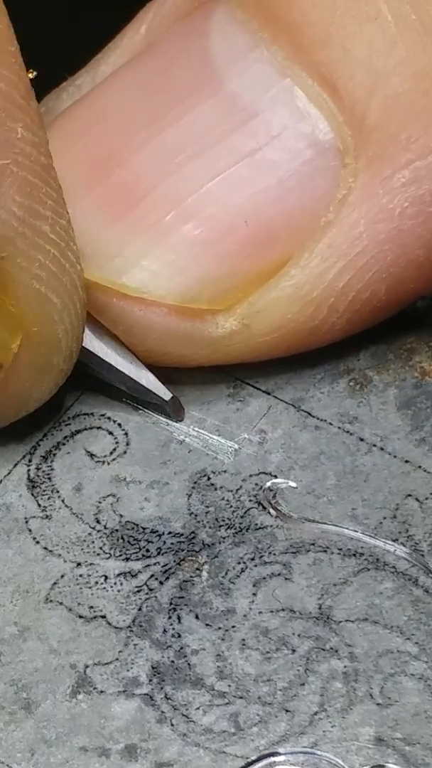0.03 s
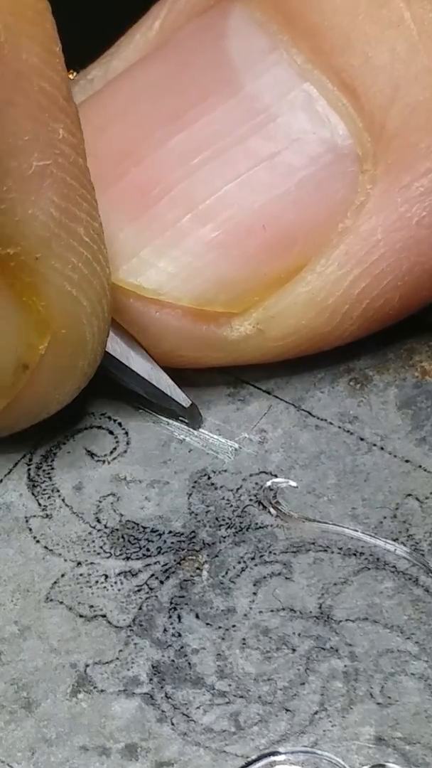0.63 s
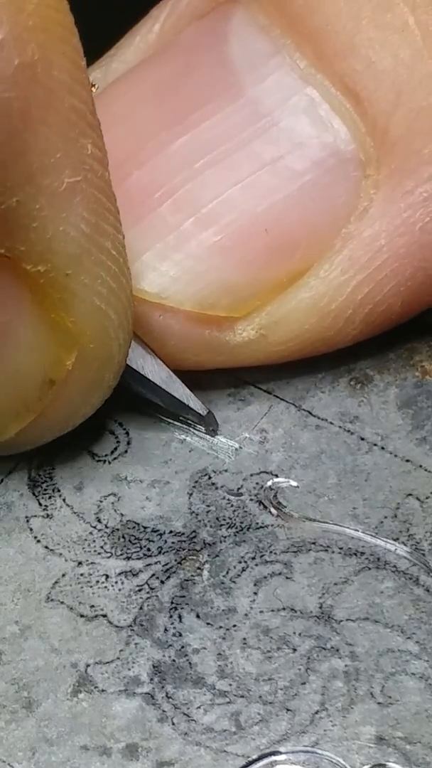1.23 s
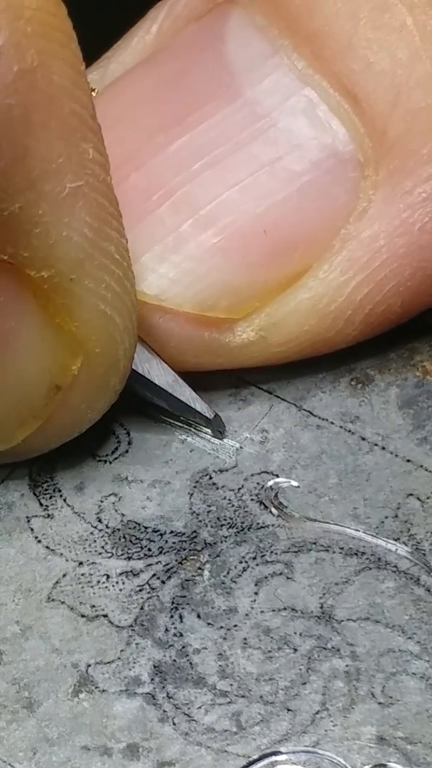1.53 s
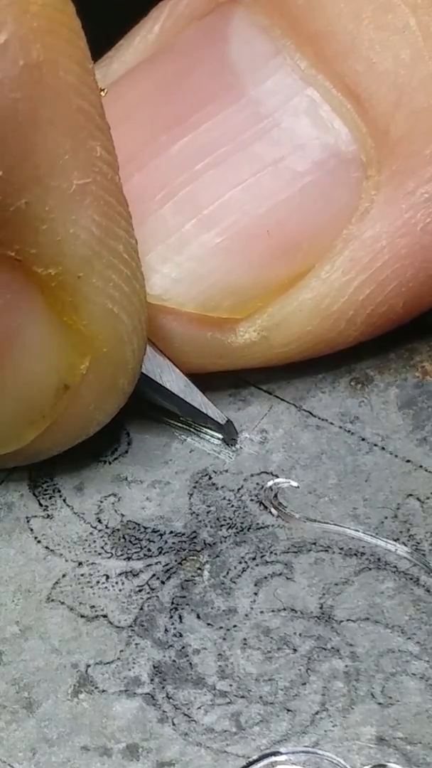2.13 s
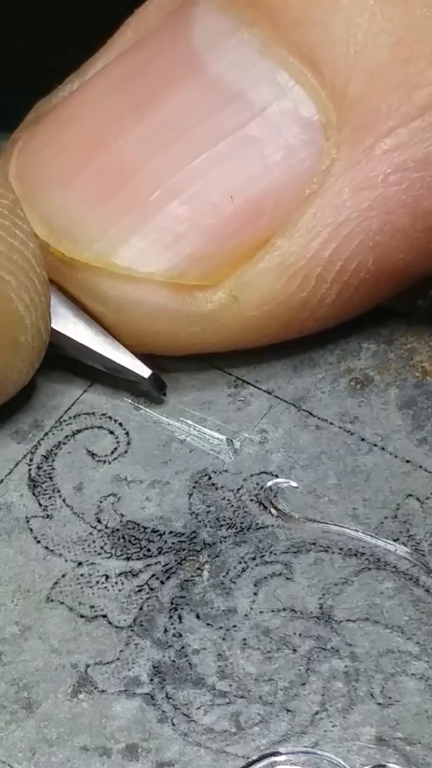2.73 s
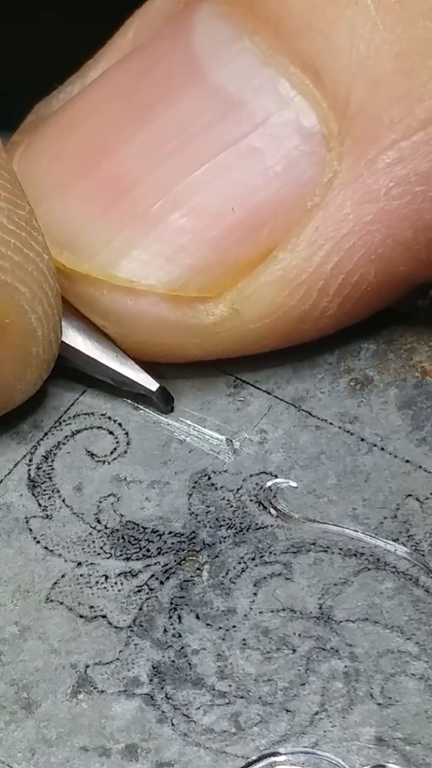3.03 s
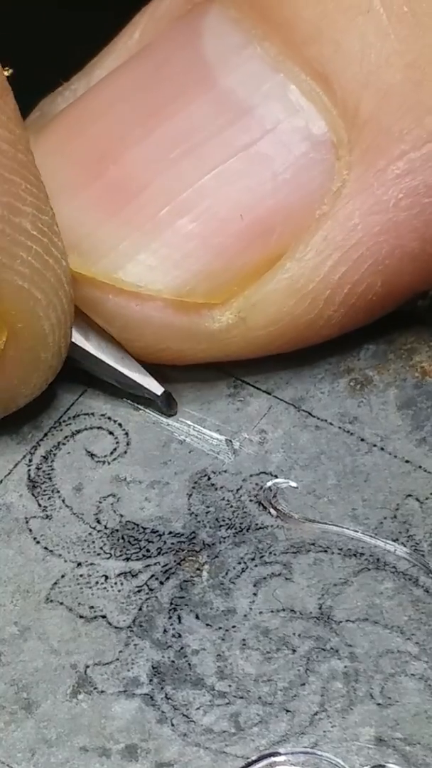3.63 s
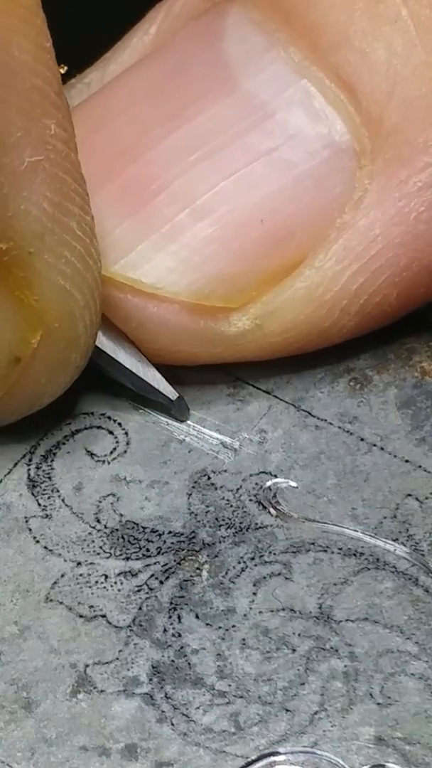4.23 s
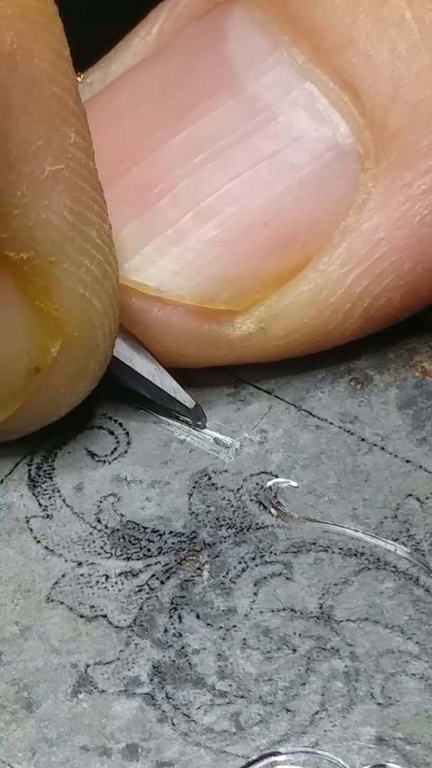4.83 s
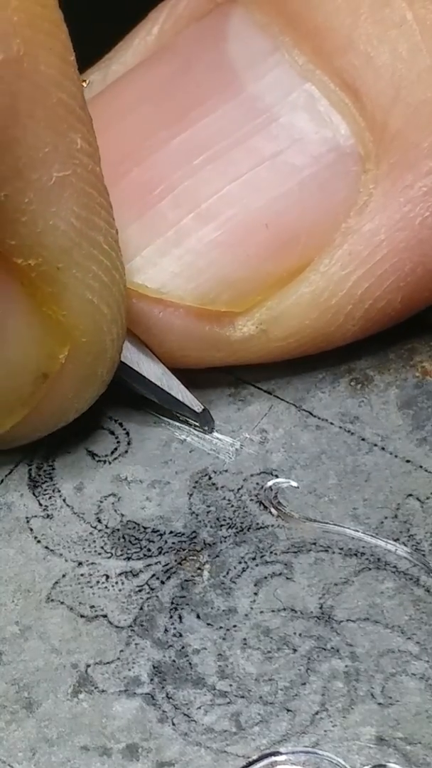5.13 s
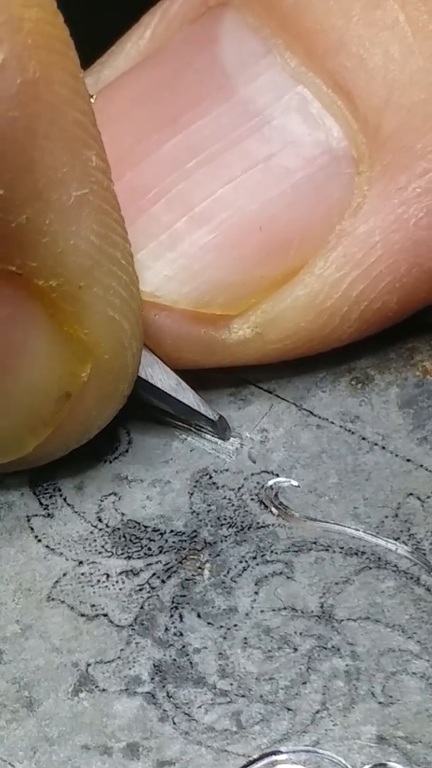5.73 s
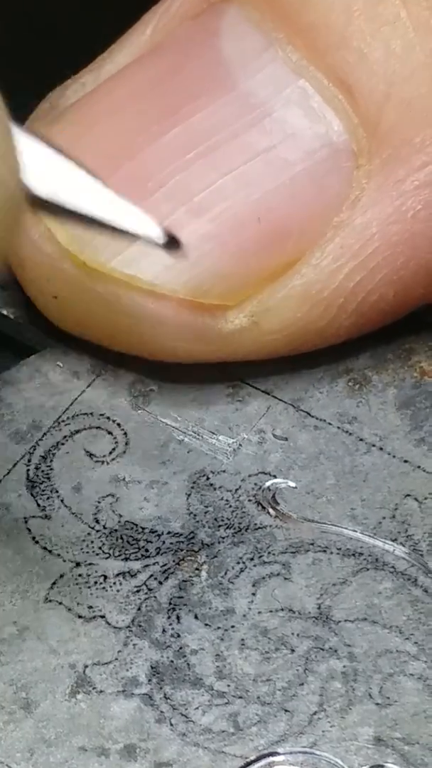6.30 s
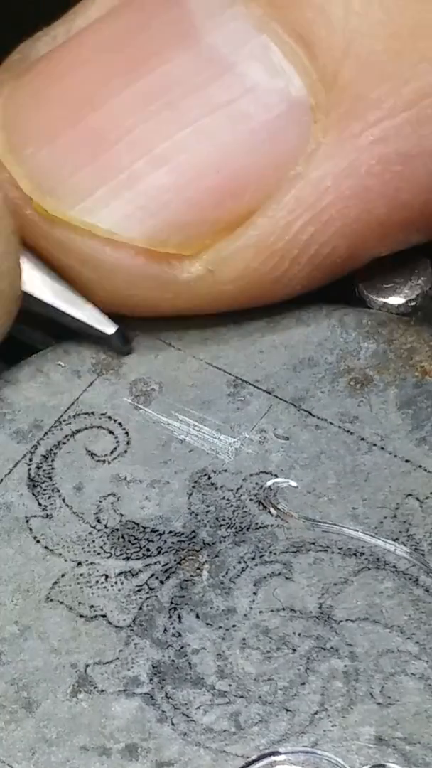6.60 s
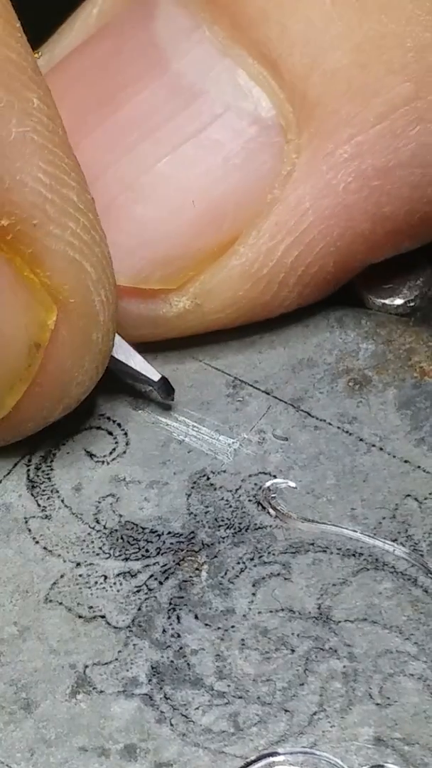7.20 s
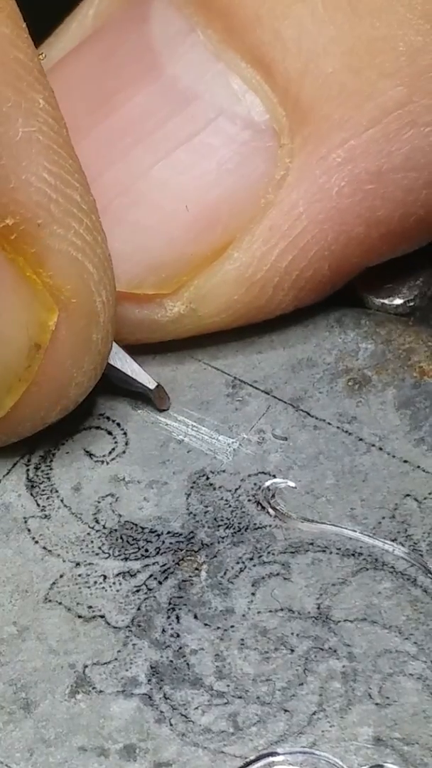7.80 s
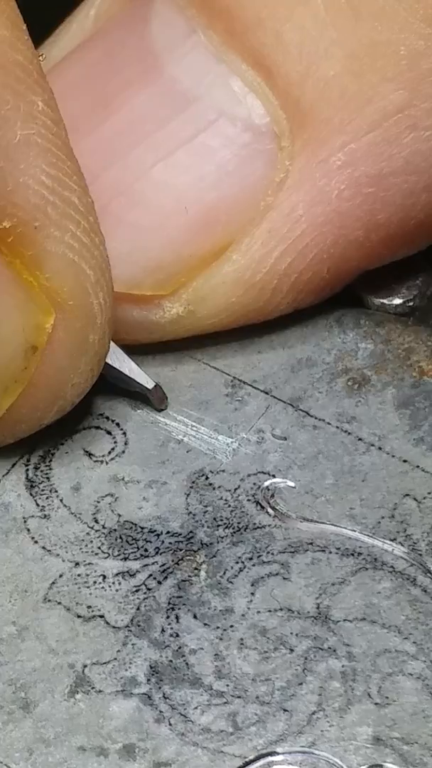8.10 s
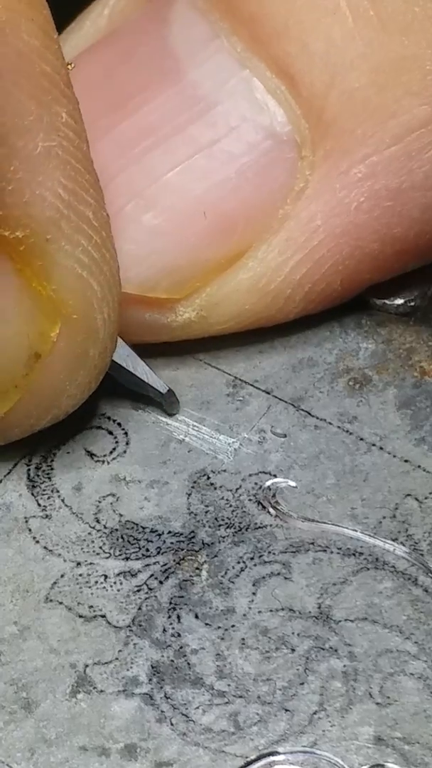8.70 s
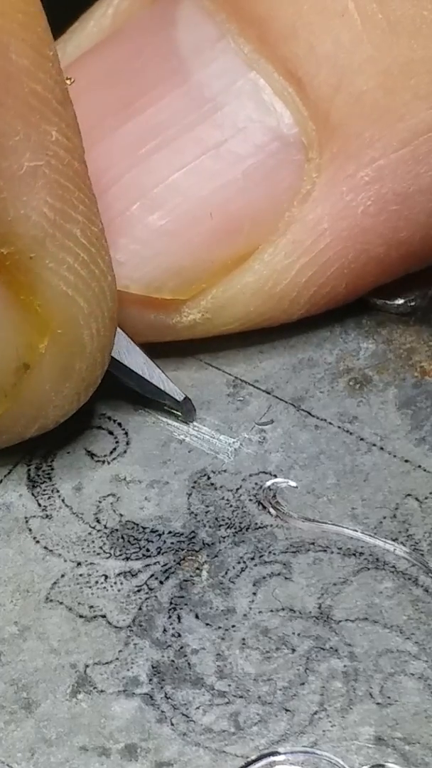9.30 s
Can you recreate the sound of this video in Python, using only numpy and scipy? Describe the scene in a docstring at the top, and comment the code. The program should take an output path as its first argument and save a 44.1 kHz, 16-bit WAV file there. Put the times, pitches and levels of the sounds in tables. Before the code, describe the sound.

An air-driven hammer engraver is heard close up in a small workshop with little echo. Almost at once it spins up into a loud, bright, rattling buzz against a steel plate, with a few dull hand bumps on the bench. The tip skids, then bites at about 0.9 seconds, and the tone turns harder. At about 2.3 seconds the buzz slows and fades to a quiet fluttering idle over a low hum and faint air hiss. Short runs of light metallic knocks come between 3 and 3.7 seconds. A second loud cut starts at 3.8 seconds, bites at about 4.5 and winds down from 6.3, followed by a brief knock and a soft bump. The tool idles quietly, with a thin, high air whistle growing slightly from 7 seconds. A third cut starts at 8.3 seconds and buzzes on to the end, at about 9.5 seconds.

```python
"""An air-driven hammer graver, a hand tool for engraving, cuts a steel plate in a small workshop.
The air supply hums and hands bump the bench as the piston speeds up from 48 to 80 strokes a second.
Each stroke puffs, rattles and strikes, ringing tool and plate; the tip skids, then bites into the steel.
Just after 2 s the tip lifts and the piston slows to a quiet idle with a few light knocks. A second cut
runs from about 3.8 to 6.3 s, the tool idles again, and a third cut runs from 8.3 s to the end."""
import sys
import numpy as np
from scipy import signal
from scipy.fft import rfft, irfft
from scipy.io import wavfile
from scipy.ndimage import uniform_filter1d

SR = 44100
rng = np.random.default_rng(int(sys.argv[2]) if len(sys.argv) > 2 else 0)


def bounce(signal):
    """Save signal as a 16-bit WAV file at the path given by the first command-line argument."""
    frames = np.transpose(np.atleast_2d(signal))
    limited = np.clip(frames, -1, 1)
    pcm = np.round(limited * 32767).astype(np.int16)
    wavfile.write(sys.argv[1], SR, pcm)


N = 412335
T = np.arange(N) / SR

# The ringing tones of tool and plate. Each row: pitch in Hz, width in Hz, relative level in dB,
# then the dB added by a full bite, by a shut throttle and by a loose tip.
STEEL_TONES = [(298, 93, -18.5, -5, 24, 1.0), (514, 73, -18.5, 3, -8, 10.5),
               (511, 350, -17.5, -5, 15.0, -0.5), (860.5, 57, -15.5, -6, 10.5, -9.5),
               (1199, 240, -13.0, -6, 6.0, -6), (1374, 223, -11.5, 4.5, -10.5, -2.0),
               (1678, 230, -15, -6, 2.5, -1), (2110, 224, -6.5, -1.5, -7.5, 0),
               (2290, 240, -6.5, 5, -21.5, -1.0), (2652, 254, 1, 0, -3.5, 2.5),
               (3108, 258, -10.5, 18, -4, -8.5), (3368, 43, -27.5, 25.5, 30, -30),
               (3485, 423, -2.0, -6, -2.5, 3.5), (3856, 128, -4.5, -4, 0.5, 6.5),
               (4000, 1100, -11.5, -3.5, -1, 6.5), (4903, 160, -10, 2, -18.5, 1.5),
               (5043, 450, -14.5, 13, -38, 10.5), (5500, 1570, -32.5, 9, 9.5, 13),
               (5942, 118, -27, 15.5, -16, 17.5), (6450, 1050, -28.5, 7.5, 4, 7),
               (7630, 950, -13.5, 6, -9, -4.5), (8210, 930, -16.5, 1.5, -4, 1.5),
               (8600, 98, -24, -24, 8, -4), (9190, 940, -16, -1.5, -2.5, 0.0),
               (10620, 440, -15, 6, 6, -11.5), (11280, 690, -17.0, 8.5, -13, 5),
               (12200, 3900, -27, -26, -2, 14), (12460, 2460, -19.5, 11, -14, 1),
               (13270, 260, -20, 10, -8, -4), (14440, 780, -10.5, 0, -3, -3.5),
               (14100, 470, -19.5, -14, 12, -15)]
# Presses of the throttle. Each row: when it is eased on, pressed and let go in seconds, top strokes a
# second, spin-up in seconds, share of the speed-up that comes slowly (0-1), coast-down in seconds,
# idle strokes a second afterwards.
THROTTLE_PRESSES = [(-0.4, 0.1296, 2.3, 80.14, 0.08, 0.09, 0.161, 48.2),
                    (3.3, 3.8274, 6.2587, 79.84, 0.0722, 0.1186, 0.198, 48.77),
                    (7.3, 8.2556, 9.5, 79.52, 0.0396, 0.1435, 0.16, 48.0)]
# One cut for each press. Each row: relative blow level in dB, when the tip bites in seconds, bite depth
# (0-1), seconds it takes to settle in its groove, when it lifts and when it is clear in seconds.
TIP_CUTS = [(-12, 0.854, 0.98, 0.18, 2.24, 2.684), (-11.5, 4.46, 0.83, 0.87, 6.215, 6.611),
            (-11.0, 8.66, 0.93, 1.0, 9.5, 9.9)]
# Runs of the idling piston knocking on its anvil. Each row: start and end in seconds,
# relative level in dB, strokes from one knock to the next.
IDLE_KNOCKS = [(0.02, 0.04, -22, 1), (2.995, 3.16, -27.5, 2), (3.33, 3.475, -22.5, 2),
               (3.495, 3.612, -19.5, 1), (3.655, 3.695, -19, 1), (6.533, 6.57, -17.5, 1)]
# The loudness of the escaping air. Each row: time in seconds, relative level in dB.
EXHAUST_LEVELS = [(0, -63), (2.7, -73), (3.3, -65), (3.82, -64), (6.6, -72), (7.1, -59), (7.6, -55.5),
                  (8.24, -59)]
# Hands bumping the bench. Each row: start in seconds, relative level in dB, pitch in Hz.
BENCH_BUMPS = [(0.124, -15.5, 126), (0.298, -21, 99.6), (0.343, -15, 113), (0.439, -25, 143),
               (1.575, -26, 99), (1.619, -27, 83.4), (2.199, -29, 95), (6.503, -24, 96.9),
               (6.57, -30, 99.6), (7.003, -33, 102)]
# The tone colour of the workshop air. Each row: frequency in Hz, relative level in dB.
AIR_COLOUR = [(18, -63), (30, -39), (73, -4), (102, -8.5), (187, -11.5), (292, -15), (341, -16),
              (492, -12.5), (921, -20), (1680, -23.5), (2690, -18), (2990, -21), (3780, -15.5), (4910, -31),
              (15500, -31)]
# The workshop's echo. Each row: frequency in Hz, seconds it takes to fade by 60 dB.
ECHO_TIMES = [(200, 0.083), (1000, 0.48), (4000, 0.22), (15000, 0.19)]
# Stereo width. Each row: frequency in Hz, relative level in dB of the left-right difference.
STEREO_SPREAD = [(40, -11), (100, -26.5), (170, -24), (320, -67), (550, -11.5), (1300, -20.5),
                 (2800, -17.5), (5000, -15.5), (15000, -17)]

SIZE, LEAD_S = 2048, .006  # samples in one stroke's sound, and its time before the blow
HZ = np.fft.rfftfreq(SIZE, 1 / SR)
AGE = np.arange(SIZE) / SR - LEAD_S  # time within one stroke, zero at the blow
IDLE_RATE, CREEP_S, COAST_SHAPE = 48, .45, 1.3  # strokes a second, slow speed-up, curve of the slow-down
EASE_S, SETTLE_S = 0.36, 1.3  # air flow rises as the throttle is eased on, then settles
FIRST_BLOW, ATTACK_SHARE, SAG_DB_PER_S = .25, 0.81, 0.86  # blows start weak, grow in the spin-up, then sag
BITE_DB, IDLE_DB, EASED_DB = -0.66, -42, 5.5  # blow level: change from biting, at idle, idle boost from air
TOUCH_BITE, TOUCH_S, DIG_S = 0.91, .14, 0.073  # the tip catches as it lands, skids, then digs in
SKID_LOOSE, SEATED_LOOSE = 0.83, 0.15  # looseness of the tip while skidding and in its groove
START_SHUT, OPEN_S, CHOKE = 0.66, .13, .2  # the throttle opens gradually; a buried tip chokes the stroke
LIFT_S, LIFT_HOLD, FADE_SHAPE = .07, .15, 1.14  # on lifting, the bite goes fast; blows hold, then fade
LIFT_BITE, LIFT_LOOSE, IDLE_BITE, IDLE_LOOSE = 0.27, 0.73, .15, 0.26  # the tip while lifting and idling


def graver(stroke_db=34.0, crack=0.75, crack_hz=5500, crack_s=0.000388, rebound=0.25, rebound_hz=720,
           scrape=0.21, loose_scrape=0.17, idle_scrape=0.53, idle_tail=0.35,
           uneven_db=0.45, idle_uneven_db=0.4, jitter_s=1.5e-6, idle_jitter_s=.00008):
    """Each stroke rattles, cracks and scrapes into the steel; idle strokes are uneven and airy."""
    times = stroke_times()
    db, bite, shut, loose = hand(times)
    idle = np.clip(shut, 0, 1) ** 2
    stronger, later = rng.standard_normal((2, len(times)))
    times = times + later * (jitter_s + idle_jitter_s * idle)
    # the rattle changes its pattern as the tip digs in
    depth = np.pi / 2 * bite[:, None]
    rattle = np.cos(depth) * chatter() + np.sin(depth) * chatter()
    # a biting tip ends its stroke with a hard, bright crack
    hard = crack * np.sqrt(ramp(bite))[:, None] * HZ ** 2 / (HZ ** 2 + crack_hz ** 2)
    blow = level_out(rattle + hard * delay(LEAD_S + crack_s))
    # half a cycle later the piston comes back with a dull thud
    thud = rebound / (1 + np.square(HZ / rebound_hz) ** 2)
    back_s = .5 / speed(times)[:, None]
    blow = blow * (1 + thud * delay(back_s)) / np.sqrt(1 + thud ** 2)
    # a loose tip scrapes, differently at every stroke; idle strokes trail off in air
    fade = swell(-0.00066, 0.0016, 0.0025) + (0.17 + idle_tail * idle[:, None]) * swell(0, 0.0008, 0.021)
    puff = rfft(rng.standard_normal((len(times), SIZE)) * fade, axis=1)
    grit_db = spectrum([(300, -14), (600, -18), (1200, -4), (3000, -2), (6000, 0.5), (14000, 0)], HZ)
    grit = (scrape + loose_scrape * loose ** 2 + idle_scrape * idle)[:, None] * amp(grit_db)
    force = (blow + grit * puff) / np.sqrt(1 + grit ** 2)
    starts = np.floor(times * SR) / SR  # whole samples; the delay below adds the fraction
    ringing = force * steel(np.c_[bite, shut, loose]) * delay((times - starts)[:, None])
    gain = amp(stroke_db + db + stronger * (uneven_db + idle_uneven_db * idle))
    out = np.zeros(N)
    for start, stroke in zip(starts, irfft(ringing, axis=1) * gain[:, None]):
        add(out, start - LEAD_S, stroke)
    return out


def steel(grip):
    """How tool and plate ring when struck: one spectrum for each row of (bite, shut, loose)."""
    tones = np.array(STEEL_TONES, float)
    hz, width, db = tones[:, :3].T
    peaks = 1 / (1 + (2 * (HZ - hz[:, None]) / width[:, None]) ** 2) ** 2
    power = amp(db + grip @ tones[:, 3:].T) ** 2 @ peaks
    return causal(np.log(power + 1e-12) / 2)


def chatter(peak_s=-0.0005057, rise_s=0.00043, fall_s=0.0016, bench=0.35, bench_s=0.0066):
    """The spectrum of a tiny rattle as the tip seats, with echoes off hands and bench."""
    shape = np.hypot(swell(peak_s, rise_s, fall_s), bench * swell(0.00145, 0.00045, bench_s))
    rattle = rng.standard_normal(SIZE)
    for _ in range(12):  # each pass evens the tone colour and smooths the fade
        loudness = np.sqrt(abs(uniform_filter1d(rattle ** 2, size=25)) + 1e-12)
        evened = level_out(rfft(shape * rattle / loudness))
        rattle = irfft(evened)
    return evened


def hand(t):
    """The tip lands, skids, digs in and lifts. Gives blow dB, then bite, shut and loose, each 0-1."""
    row, since = latest_press(t)
    blow_db, bites, depth, seat_s, lifts, clear = np.array(TIP_CUTS)[row].T
    spin_s = np.array(THROTTLE_PRESSES)[row, 4]
    started, since = since >= 0, np.maximum(since, 0)
    dug = depth * (1 + np.tanh((t - bites) / (2 * DIG_S))) / 2
    lifted, away = ramp((t - lifts) / LIFT_S), ramp((t - lifts) / (clear - lifts))
    contact = started * ramp((1 - away) / (1 - LIFT_HOLD)) ** FADE_SHAPE
    attack = blend(1, FIRST_BLOW, np.exp(-since / (ATTACK_SHARE * spin_s)))
    blow = contact * attack * amp(blow_db + BITE_DB * dug - SAG_DB_PER_S * since)
    db = 20 * np.log10(np.hypot(blow, amp(IDLE_DB + EASED_DB * flow(t))))
    bite = blend(dug + TOUCH_BITE * np.exp(-(since / TOUCH_S) ** 4), LIFT_BITE, lifted)
    shut = blend(START_SHUT * np.exp(-since / OPEN_S) + CHOKE * dug, 0.98, (1 - contact) ** 2)
    loose = blend(SEATED_LOOSE, SKID_LOOSE, np.exp(-np.maximum(t - bites + 2 * DIG_S, 0) / seat_s))
    loose = blend(loose, LIFT_LOOSE, ramp(2 * away))
    cutting = ramp(10 * contact)
    return db, ramp(blend(IDLE_BITE, bite, cutting)), ramp(shut), ramp(blend(IDLE_LOOSE, loose, cutting))


def stroke_times(travel_s=.0019):
    """When the piston arrives at the end of each stroke."""
    turns = piston_turns()
    return np.interp(np.arange(1, int(turns[-1]) + 1), turns, T) + travel_s


def piston_turns():
    """A running count of strokes. The piston fires on each whole number, and at once on a press."""
    turns = np.cumsum(speed(T)) / SR + .55
    for _, pressed, *_ in THROTTLE_PRESSES:
        turns = turns + (T >= pressed) * (-turns[np.searchsorted(T, pressed)] % 1)
    return turns


def speed(t):
    """Strokes a second: a quick spin-up, a slow creep to the top, a coast back to idle."""
    row, since = latest_press(t)
    _, _, let_go, top, spin_s, slow, coast_s, idle = np.array(THROTTLE_PRESSES)[row].T
    since = np.maximum(since, 0)
    running = blend(top, IDLE_RATE, blend(np.exp(-since / spin_s), np.exp(-since / CREEP_S), slow))
    return blend(idle, running, np.exp(-(np.maximum(t - let_go, 0) / coast_s) ** COAST_SHAPE))


def flow(t):
    """Extra air flow, 0-1, around the start of each cut."""
    return np.max([ramp((t - eased) / EASE_S) * np.exp(-np.maximum(t - pressed, 0) / SETTLE_S)
                   for eased, pressed, *_ in THROTTLE_PRESSES], axis=0)


def latest_press(t):
    """The row of the latest press, and the seconds since it (negative before the first)."""
    pressed = np.array(THROTTLE_PRESSES)[:, 1]
    row = np.maximum(np.searchsorted(pressed, t, "right") - 1, 0)
    return row, t - pressed[row]


def knocks(knock_db=-5, uneven_db=1.5, bite=0.41, shut=0.65, loose=1.0):
    """Between the cuts some strokes reach the anvil with a light blow."""
    ring = irfft(steel(np.array([[bite, shut, loose]]))[0] * chatter(fall_s=0.00093))
    ring /= abs(ring).max()
    strokes, out = stroke_times(), np.zeros(N)
    for start, end, db, every in IDLE_KNOCKS:
        run = strokes[(strokes > start) & (strokes < end)]
        for s in run[::every]:
            add(out, s - LEAD_S, amp(db + knock_db + uneven_db * rng.standard_normal()) * ring)
    return out


def recoil(powered_db=(-56, -50), idle_db=(-72, -72, -59, -66, -62, -60, -66, -66, -63, -61), loose_db=5):
    """The tool shakes at the first multiples of the stroke rate; under power a loose tip adds to it."""
    turns = piston_turns()
    _, _, shut, loose = hand(T)
    powered, idling = (
        sum(amp(db) * np.sin(2 * np.pi * (k * turns + rng.random())) for k, db in enumerate(levels, 1))
        for levels in (powered_db, idle_db))
    return np.sqrt(2) * ((1 - shut) * amp(loose_db * loose) * powered + shut * idling)


def exhaust(whistle_hz=10900, width_hz=420, whistle_db=-2, lag_turns=0.2,
            hiss_hz=14900, hiss_width_hz=900, hiss_db=-3):
    """Spent air whistles out just after each stroke, with a steadier hiss above it."""
    pulses = unit(np.exp(2.0 * np.cos(2 * np.pi * (piston_turns() - lag_turns))))
    whistle = noise(lambda f: 1 / (1 + (2 * (f - whistle_hz) / width_hz) ** 2))
    hiss = noise(lambda f: 1 / (1 + (2 * (f - hiss_hz) / hiss_width_hz) ** 2))
    level_db = np.interp(T, *np.transpose(EXHAUST_LEVELS))
    return amp(level_db) * (amp(whistle_db) * pulses * whistle + amp(hiss_db) * hiss)


def bumps(bump_db=-3, rise_s=0.0054):
    """Hands bump the bench: dull thumps that swell and die within a few cycles."""
    t, out = np.arange(SR // 5) / SR, np.zeros(N)
    shape = (t / rise_s * np.exp(1 - t / rise_s)) ** 2
    for start, db, hz in BENCH_BUMPS:
        add(out, start, amp(db + bump_db) * shape * np.sin(2 * np.pi * hz * t))
    return out


def hum(hum_hz=100.37, hum_db=-44, flow_db=5.0, waver_db=1.1, waver_hz=3):
    """One deep, wavering tone from the air supply, louder as more air flows."""
    waver = noise(lambda f: np.exp(-(f / waver_hz) ** 2))
    return amp(hum_db + flow_db * flow(T) + waver_db * waver) * unit(np.sin(2 * np.pi * hum_hz * T))


def air(air_db=-51, flow_db=6.0, apart=0.12):
    """A soft wash of air that swells with the flow, nearly the same on both sides."""
    mid, side = (noise(lambda f: amp(spectrum(AIR_COLOUR, f))) for _ in range(2))
    return amp(air_db + flow_db * flow(T)) * np.array([mid + apart * side, mid - apart * side])


def room(x, first_s=0.001):
    """The walls give a short, blurred echo; each frequency fades at its own speed."""
    echoes = rng.standard_normal(SR // 3) * (T[:SR // 3] > first_s)
    hz, t, bands = signal.stft(echoes, SR, nperseg=256)
    fade = amp(-60 * t / spectrum(ECHO_TIMES, hz)[:, None])
    tail = signal.istft(bands * fade, SR, nperseg=256)[1]
    return signal.fftconvolve(x, tail / np.linalg.norm(tail))[:N]


def swell(peak_s, rise_s, fall_s):
    """A quick rise and fall within one stroke, with a total energy of 1."""
    past_peak = AGE - peak_s
    shape = np.exp(np.minimum(past_peak / rise_s, -past_peak / fall_s))
    return shape / np.linalg.norm(shape)


def delay(s):
    """Multiplying a stroke's spectrum by this makes it s seconds later."""
    return np.exp(-2j * np.pi * HZ * s)


def causal(log_gain):
    """Spectra with the given log gain that ring only after they are struck."""
    mirrored = np.concatenate([log_gain, log_gain[..., -2:0:-1]], axis=-1)
    return np.exp(np.conj(signal.hilbert(mirrored)))[..., :len(HZ)]


def level_out(z, width_hz=220):
    """Evens the broad humps of a spectrum and keeps its fine ripple."""
    power = uniform_filter1d(abs(z) ** 2, int(width_hz / HZ[1]), axis=-1)
    return z / np.sqrt(abs(power) + 1e-12)


def noise(gain):
    """Noise of average (rms) level 1, coloured by the function gain(Hz)."""
    return unit(irfft(rfft(rng.standard_normal(N)) * gain(np.fft.rfftfreq(N, 1 / SR)), N))


def spectrum(rows, hz):
    """Reads between the rows of a table on a log-frequency scale."""
    f, value = np.transpose(rows)
    return np.interp(np.log(hz + 1), np.log(f + 1), value)


def add(mix, s, sound):
    """Mixes a sound in at s seconds."""
    start = int(round(s * SR))
    sound = sound[max(-start, 0):]
    part = mix[max(start, 0):][:len(sound)]
    part += sound[:len(part)]


def amp(db):
    """Turns decibels into a gain."""
    return 10 ** (np.asarray(db) / 20)


def unit(x):
    """Scales to an average (rms) level of 1."""
    return x / np.sqrt(np.mean(x ** 2) + 1e-20)


def ramp(x):
    """Holds a control within 0-1."""
    return np.clip(x, 0, 1)


def blend(a, b, share):
    """Goes from a to b as share goes from 0 to 1."""
    return a + (b - a) * share


def scene(room_db=-19, direct=0.52, diffuse=.8):
    """The tool in the middle, slightly out of step left and right; the walls spread it a little."""
    tool = graver() + knocks() + exhaust()
    mid = tool + amp(room_db) * room(tool) + recoil() + hum() + bumps()
    spread = amp(spectrum(STEREO_SPREAD, np.fft.rfftfreq(N, 1 / SR)))
    side = irfft(spread * (1j * direct * rfft(mid) + diffuse * rfft(room(mid))), N)
    return np.array([mid + side, mid - side]) + air()


def record(dry):
    """Cuts away the highest treble, above 15900 Hz."""
    low_pass = signal.firwin(511, 15900, window=("kaiser", 9), fs=SR)
    return signal.oaconvolve(dry, low_pass[None], "same")


dry = scene()
out = record(dry)
bounce(out)
```